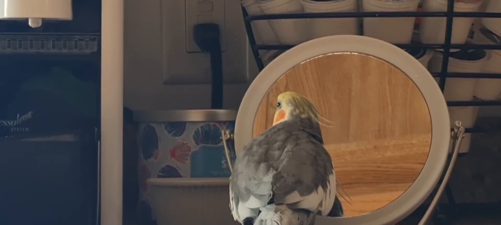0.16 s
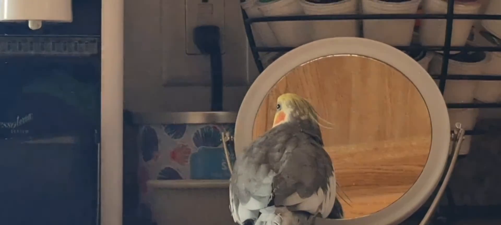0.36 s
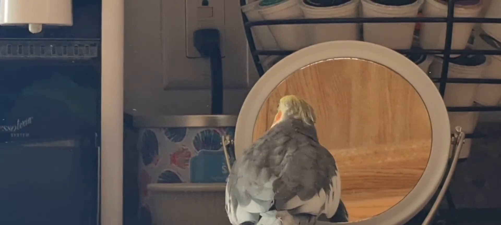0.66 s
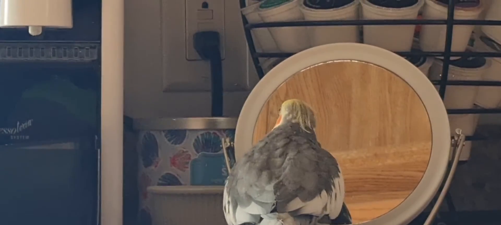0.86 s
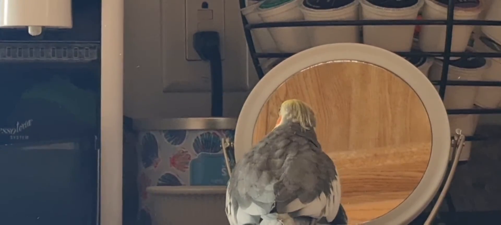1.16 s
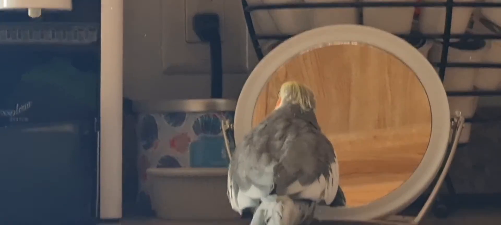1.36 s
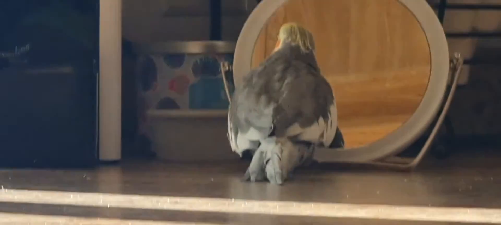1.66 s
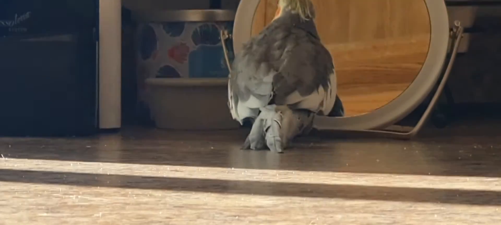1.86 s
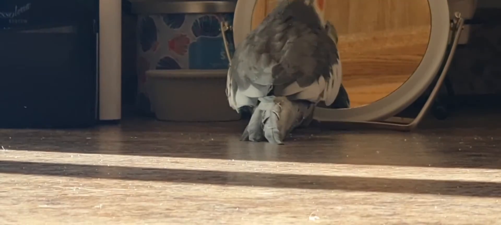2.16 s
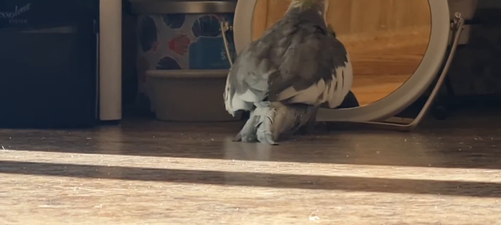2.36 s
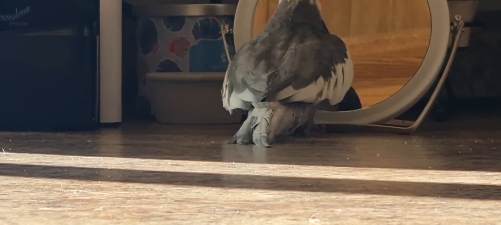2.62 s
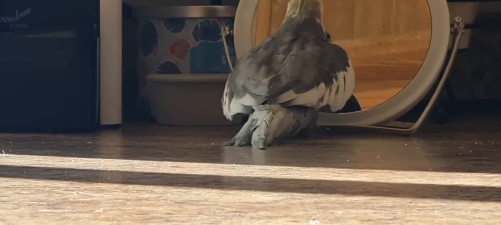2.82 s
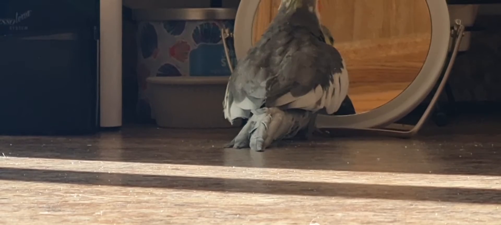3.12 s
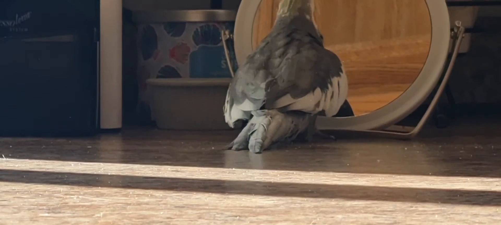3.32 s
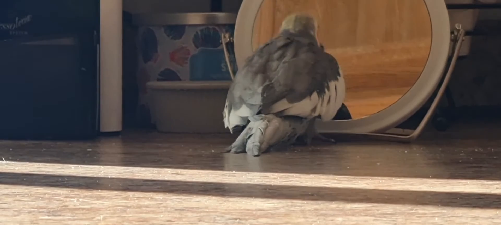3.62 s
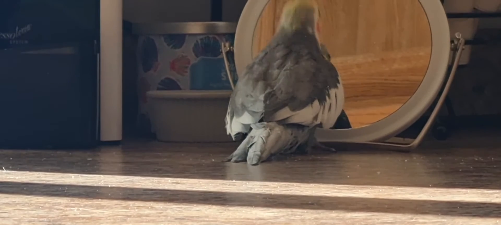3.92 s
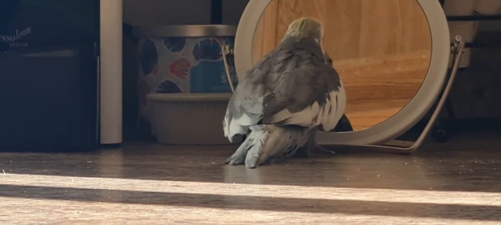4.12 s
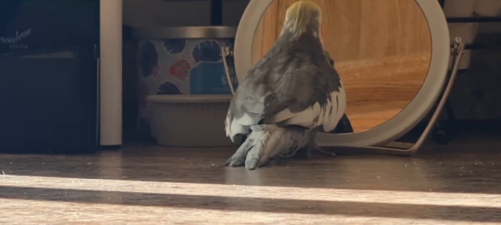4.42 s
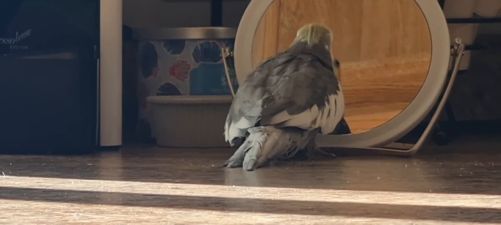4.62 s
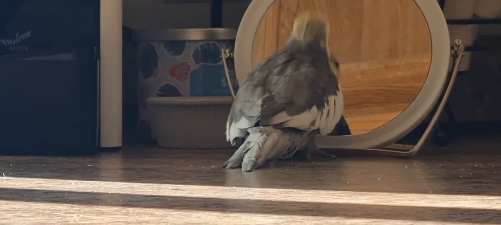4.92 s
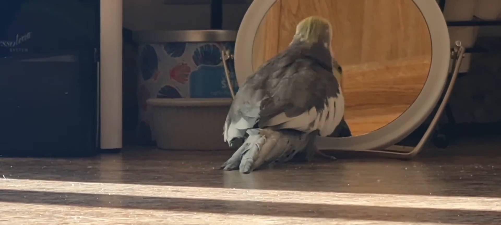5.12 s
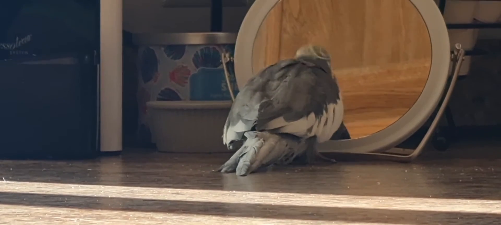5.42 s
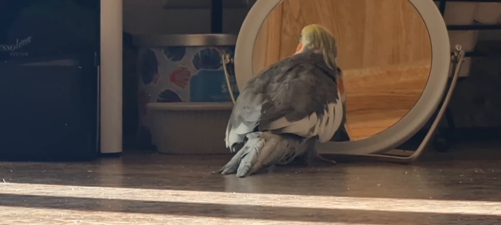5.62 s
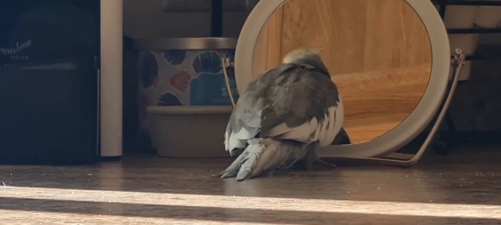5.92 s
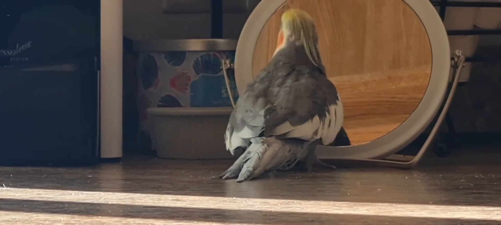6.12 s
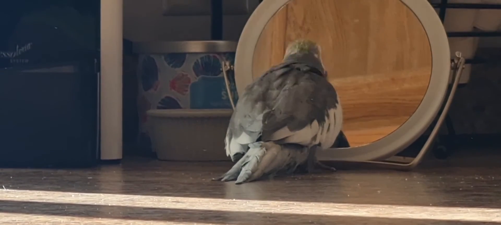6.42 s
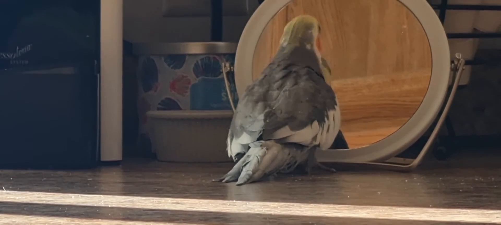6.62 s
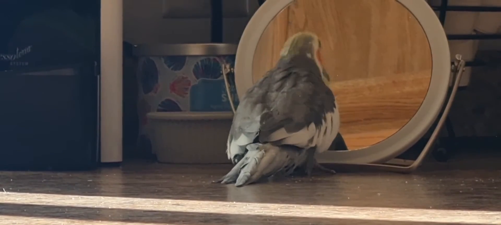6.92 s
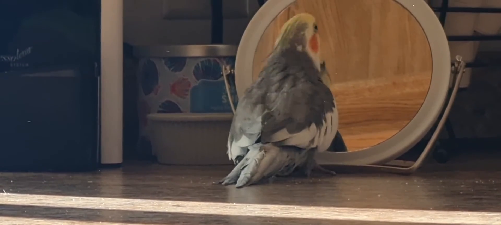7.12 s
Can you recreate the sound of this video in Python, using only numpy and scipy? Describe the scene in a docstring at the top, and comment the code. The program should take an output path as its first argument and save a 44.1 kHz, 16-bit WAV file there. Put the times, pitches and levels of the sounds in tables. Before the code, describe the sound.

In a quiet kitchen, a refrigerator hums faintly throughout. After a few soft, dull ticks, a cockatiel gives two hoarse chirps. It then starts rapping its beak on a table mirror, about twice a second, each knock with a glassy tick and a slight rattle. Short arched whistles, some wavering or raspy, fall between the raps. The bird sounds close and central, with a brief room reverberation.

```python
"""A refrigerator hums throughout in a quiet kitchen. After a few soft ticks, a cockatiel gives two hoarse
chirps, pulse trains filtered by its throat. From 2.4 s its beak raps a table mirror, exciting the modes
of frame and glass. From 2.9 s it whistles short arched notes among the raps: a near sine with faint
overtones, which turns raspy when its cycles group in twos to sevens. Faint scuffs pass at about 4 s.
Each call and rap leaves a brief reverberation in the room."""
import sys
import numpy as np
from scipy import signal
from scipy.io import wavfile
from scipy.ndimage import uniform_filter1d

SR = 44100
rng = np.random.default_rng(int(sys.argv[2]) if len(sys.argv) > 2 else 0)


def transcribe(signal):
    """Save signal, clipped to [-1, 1], as a 16-bit WAV file at the path in sys.argv[1]."""
    frames = np.atleast_2d(signal).T
    limited = np.clip(frames, -1, 1)
    pcm = np.round(limited * 32767).astype(np.int16)
    wavfile.write(sys.argv[1], SR, pcm)


N = 320607
CUTOFF_HZ = 15800

# Held and gliding notes, one table each. Each row: time in seconds, pitch in Hz, whistle level in dB,
# high overtones in dB re the whistle before the beak colours them.
GLIDING_NOTES = [
    [(2.915, 1717, -28.5, -27.5), (2.975, 1939, -9.5, -38.5), (3.011, 1930, -11.5, -40),
     (3.057, 2083, -14, -28.5), (3.163, 2012, -17, -28), (3.203, 2059, -19, -29), (3.227, 1919, -13, -30.5),
     (3.247, 1707, -28, -37), (3.26, 1830, -32, -39)],
    [(3.51, 1537, -38.5, -38), (3.528, 1528, -25, -28), (3.602, 2079, -14.5, -33.5),
     (3.656, 2111, -13.5, -43), (3.68, 1985, -13, -35), (3.726, 1330, -26, -32.5),
     (3.775, 1179, -34.5, -26.5)],
    [(4.852, 2096, -24, -47.5), (4.866, 2206, -24.5, -51.5), (4.882, 2230, -18.5, -50.5),
     (4.904, 2077, -15.5, -44.5), (4.932, 2200, -20.5, -36), (4.96, 2127, -23.5, -36),
     (4.99, 2196, -15.5, -34), (5.014, 1993, -16.5, -35), (5.03, 1900, -40.5, -43)],
    [(5.31, 1692, -32.5, -46), (5.322, 1676, -28.5, -46), (5.398, 1411, -25, -38), (5.41, 1354, -48, -47.5)],
    [(5.55, 1688, -30.5, -39.5), (5.592, 1877, -14, -41), (5.648, 1895, -15, -28.5), (5.73, 1783, -17, -35),
     (5.738, 1732, -22.5, -47.5), (5.786, 1733, -28, -35.5), (5.808, 1668, -27, -39.5),
     (5.912, 1641, -24, -29.5), (5.945, 1564, -31, -42)],
    [(6.515, 1830, -37.5, -15), (6.559, 1958, -10, -46), (6.569, 2050, -13, -43.5), (6.655, 2177, -21, -35),
     (6.687, 2076, -18, -33), (6.729, 2093, -23.5, -31.5), (6.821, 2134, -14, -24.5),
     (6.891, 1944, -14, -32.5), (6.905, 1949, -34, -37.5)],
    [(7.168, 1573, -32.5, -31), (7.188, 1620, -30.5, -39), (7.204, 1760, -16, -39),
     (7.242, 2020, -13, -41.5), (7.27, 2119, -18, -39)],
]
# Arched notes. Each row: start and end in seconds, first and top pitch in Hz, the two levels as above.
ARCHED_NOTES = [(3.298, 3.399, 1927, 2100, -16.5, -38), (4.638, 4.76, 1591, 2083, -15, -47.5),
                (5.106, 5.208, 1900, 2008, -13.5, -42), (5.994, 6.095, 1713, 1942, -14.5, -40.5),
                (6.963, 7.052, 2028, 2062, -14, -45.5)]


def song():
    """Self-sustained oscillation: whistle, overtones and rasp all follow one wavering pitch."""
    notes = [*GLIDING_NOTES, *[arch(*row) for row in ARCHED_NOTES]]
    (pitch, whistle_db, high_db), sounding = phrase(sorted(notes, key=lambda rows: rows[0][0]))
    rasp_db, cycles, breathiness = roughness(whistle_db)
    low_db = low_overtone_level(pitch, rasp_db)
    pitch = pitch + 13 * wobble(8.7, 110)   # 13 Hz rms of waver
    phase = 2 * np.pi * np.cumsum(pitch) / SR
    whistle = np.sqrt(2) * np.sin(phase)
    tones = whistle * from_db(1.22 * wobble(9.3, 68))
    tones += overtones(phase, pitch, low_db, high_db)
    beat = cycle_grouping(pitch, cycles, breathiness)
    rasp = from_db(whistle_db + rasp_db) * 2 * beat * whistle * sounding
    rasp = steep_band(rasp, 750, 2600)
    overtone_rasp = from_db(rasp_db + 6.5) * beat * band(tones, 2500, 11000)
    return panned(from_db(whistle_db) * (tones + overtone_rasp) * sounding + rasp, .1)


# Rise of an arched note. Each row: share of the length, share of the climb, level in dB re full.
ARCH_SHAPE = [(0, 0.011, -17), (.33, 0.802, -2.5), (0.596, .99, 0)]


def arch(start, end, first_hz, top_hz, db, high_db):
    """Pitch and level follow the breath: a note climbs and swells, then droops as it runs out."""
    droop_s, droop_hz, droop_db = .03, 240.8, -7
    rise = [(start + share * (end - start), first_hz + climb * (top_hz - first_hz), db + re_db, high_db)
            for share, climb, re_db in ARCH_SHAPE]
    return rise + [(end - droop_s, top_hz, db, high_db), (end, top_hz - droop_hz, db + droop_db, high_db)]


# Low overtone strength. Each row: time in seconds, level in dB re a clear whistle at 2 kHz.
LOW_OVERTONE_CURVE = [(2.95, -33), (3.05, -37.5), (3.2, -30), (3.35, -30), (3.6, -27), (4.7, -29.5),
                      (4.95, -32.5), (5.15, -31.5), (5.36, -27.5), (5.65, -30.5), (5.9, -25), (6.05, -27.5),
                      (6.56, -25.5), (6.7, -36), (6.85, -30), (7.0, -31), (7.22, -24.5)]


def low_overtone_level(pitch, rasp_db):
    """Spectral balance: the low overtones strengthen as pitch sinks and weaken in a strong rasp."""
    db_per_octave, rasp_knee_db = -9.5, -24
    db = np.interp(np.arange(N) / SR, *np.transpose(LOW_OVERTONE_CURVE))
    return db + db_per_octave * np.log2(pitch / 2000) - .9 * np.maximum(rasp_db - rasp_knee_db, 0)


# Low overtones. Each row: harmonic number, level offset in dB.
LOW_HARMONICS = [(2, -2.5), (3, -7)]
# High overtones. Each entry: harmonic number.
HIGH_HARMONICS = [4, 5, 6, 7, 8, 9]
# The beak's colouring of the high overtones. Each row: frequency in Hz, gain in dB.
BEAK_RESPONSE = [(6000, -11.5), (8300, -16.5), (10500, -13), (12600, -5.5), (14500, -12.5), (15800, -24)]


def overtones(phase, pitch, low_db, high_db):
    """Radiation of a harmonic series: the beak opens wider on high pitches and lets the top out."""
    gape_db_per_octave, blur_radians = 45.5, .3
    high_db = high_db + gape_db_per_octave * np.log2(pitch / 2000)
    levels = [(k, low_db + db) for k, db in LOW_HARMONICS]
    levels += [(k, high_db + at_hz(BEAK_RESPONSE, k * pitch)) for k in HIGH_HARMONICS]
    out = np.zeros(N)
    for k, db in levels:
        gain = from_db(db + 4.28 * wobble(4, 80))   # each comes and goes as the beak trembles
        blur = blur_radians * wobble(15, 120)
        out += gain * np.sqrt(2) * np.sin(k * phase + blur) * (k * pitch < CUTOFF_HZ)
    return out


# Raspy spells. Each row: start and end in seconds, cycles per group, rasp in dB re the whistle.
RASP_SPELLS = [(3.142, 3.215, 3, -47.5), (3.3, 3.322, 3, -15), (3.708, 3.742, 2, -24),
               (4.862, 4.896, 2, -29.5), (4.921, 4.978, 3, -26), (5.008, 5.032, 3, -26.5),
               (5.31, 5.345, 3, -10), (5.349, 5.402, 2, -26), (5.755, 5.802, 5, -10.5),
               (5.808, 5.856, 7, -16.5), (6.611, 6.768, 3, -25.5)]


def roughness(whistle_db):
    """Modulation depth: each spell sets its own rasp; between spells a weaker voice is rougher."""
    clear_rasp_db, loud_db = -52, -12.5
    rasp_db = clear_rasp_db + 1.48 * (loud_db - whistle_db)
    cycles, breathiness = np.full(N, 3.), np.full(N, .6)
    for start, end, group, db in RASP_SPELLS:
        spell = slice(round(start * SR), round(end * SR))
        rasp_db[spell], cycles[spell], breathiness[spell] = db, round(group), .36
    return uniform_filter1d(rasp_db, size=400), cycles, breathiness


def cycle_grouping(pitch, cycles, breathiness):
    """Subharmonics: grouped cycles put lines at fractions of the pitch, and turbulence smears them."""
    group_hz = pitch / cycles + 15 * wobble(25, 180)
    phase = 2 * np.pi * np.cumsum(group_hz) / SR
    lines = sum(np.cos(k * phase + k * k) * (2 * k <= cycles) for k in range(1, 4))
    return (1 - breathiness) * lines + breathiness * wobble(100, 670)


# Hoarse chirps, one table each. Each row: time in seconds, pulses per second, buzz level in dB,
# second harmonic level in dB.
HOARSE_CHIRPS = [
    [(.744, 1380, -39.5, -57.5), (.757, 1100, -48.5, -37.5), (.762, 930, -27.5, -19),
     (.771, 844, -31.5, -37), (.783, 950, -29.5, -22.5), (.802, 874, -36, -28.5), (.817, 525, -47, -42.5),
     (.83, 505, -58, -50)],
    [(.849, 560, -55.5, -38.5), (.858, 648, -43, -24), (.882, 723, -42, -24), (.897, 800, -24.5, -36.5),
     (.915, 938, -19, -12.5), (.936, 930, -27, -28.5), (.95, 850, -32.5, -41.5), (.98, 520, -52, -35.5),
     (.995, 570, -64.5, -66)],
]
# Throat resonances. Each row: centre in Hz, width in Hz, relative gain in dB.
FORMANTS = [(1470, 507, 6), (1946, 480, 8.5), (2620, 690, 3), (3970, 520, -20.5), (4720, 1000, -18),
            (7640, 1100, -28), (12900, 2400, -34.5)]


def chirps():
    """Source and filter: the throat colours pulses and breath; the windpipe favours harmonic two."""
    (rate, buzz_db, second_db), sounding = phrase(HOARSE_CHIRPS)
    phase = 2 * np.pi * np.cumsum(rate) / SR
    slack = np.gradient(rate) * SR < -4000   # the voice turns breathy in falls steeper than 4000 Hz/s
    breathiness = uniform_filter1d(np.where(slack, .77, .12), size=600)
    pulses = rms_one(sum(np.cos(k * phase) for k in range(1, 15)))
    source = (1 - breathiness) * pulses + 2.4 * breathiness * rng.standard_normal(N)
    buzz = np.zeros(N)
    for k, (hz, width_hz, db) in enumerate(FORMANTS):
        broad = band(source, hz - width_hz, hz + width_hz)
        buzz += (-1) ** k * from_db(db) * band(broad, hz - width_hz / 2, hz + width_hz / 2)
    second = from_db(second_db) * np.sqrt(2) * np.cos(2 * phase)
    return (rms_one(buzz) * from_db(buzz_db) + second) * sounding


# Beak blows. Each row: time in seconds, strength in dB, then brightness, deep thud and hollow thud
# in dB re that strength.
BLOWS = [(2.389, -8.5, -24, -34.5, -27), (2.862, -6, -23, -26.5, -30), (3.325, -10, -29.5, -34, -27.5),
         (3.714, -13.5, -26.5, -37, -29), (4.089, -8, -30.5, -27.5, -31), (4.613, -8.5, -35, -29, -22.5),
         (5.082, -11.5, -30.5, -36.5, -24.5), (5.51, -10.5, -38, -47, -22), (6.015, -12.5, -31, -34.5, -26),
         (6.485, -8, -30, -35.5, -29), (6.928, -9, -42, -39, -31)]
# Two frame thuds, then the body's modes. Each row: frequency in Hz, relative level in dB, T60 in seconds.
MIRROR_MODES = [(252, 4.5, 0.079), (393.6, 4, 0.073), (970.3, -11, 0.087), (1152, -12.5, 0.074),
                (1394, 0, 0.018), (1480, -1, 0.0077), (1800, -4, 0.033), (2446, -7.5, 0.021)]
# Modes of the glass. Each row: frequency in Hz, relative level in dB, T60 in seconds.
GLASS_MODES = [(3300, -9.5, 0.013), (3540, 3.5, 0.032), (4910, -1, 0.033), (6000, -20.5, 0.0088),
               (8800, -2.5, .03)]


def raps():
    """Impact excitation: the beak sets off frame thuds, a body knock, a glass tick and a rattle."""
    contact_s = .0015
    times, blow_db, bright_db, deep_db, hollow_db = np.transpose(BLOWS)
    hits = np.round((times + contact_s) * SR).astype(int)
    parts = [(MIRROR_MODES[:1], deep_db, (190, 320)), (MIRROR_MODES[1:2], hollow_db, (310, 480)),
             (MIRROR_MODES[2:], -8, (750, 9000)), (GLASS_MODES, bright_db, (2500, 15000))]
    out = np.zeros(N)
    for modes, db, edges_hz in parts:
        clicks = np.zeros(N)
        clicks[hits] = -from_db(blow_db + db)
        out += band(ring(clicks, modes), *edges_hz)   # each part radiates only near its own modes
    return out + rattle(hits, blow_db, bright_db)


def ring(clicks, modes):
    """Modal vibration: each click drives every damped resonator with a random strength of its own."""
    out, hits = np.zeros(N), np.flatnonzero(clicks)
    for hz, db, t60 in modes:
        decay, angle = from_db(-60 / (t60 * SR)), 2 * np.pi * hz / SR
        force = clicks + 1e-18
        force[hits] *= from_db(db + rng.normal(0, 2.2, len(hits)))
        out += signal.lfilter([0, np.sin(angle)], [1, -2 * decay * np.cos(angle), decay * decay], force)
    return out


# Bands of the stand's rattle. Each row: lower and upper edge in Hz.
RATTLE_BANDS = [(900, 3500), (3500, 7600), (8400, 10500), (10500, 15600)]
# Decay of those bands. Each row: level in dB re the blow, T60 in seconds.
RATTLE_DECAYS = [(-21, 0.1), (-32.5, 0.17), (-39, 0.16), (-40.5, 0.21)]


def rattle(hits, blow_db, bright_db):
    """Exponential decay of noise: the stand rattles briefly, with more treble after a bright blow."""
    out = np.zeros(N)
    for (low_hz, high_hz), (db, t60) in zip(RATTLE_BANDS, RATTLE_DECAYS):
        clicks = np.zeros(N)
        clicks[hits] = from_db(blow_db + .4 * (bright_db + 27) * (low_hz > 3000))
        envelope = signal.lfilter([1], [1, -from_db(-60 / (t60 * SR))], clicks + 1e-18)
        out += from_db(db) * envelope * wobble(low_hz, high_hz)
    return out


# Faint hisses. Each row: start and end in seconds, lower and upper edge in Hz, top level in dB.
HISSES = [(4.0, 4.097, 1844, 7490, -47.5), (4.034, 4.146, 3160, 3370, -42),
          (4.044, 4.142, 6110, 6450, -50.5), (4.404, 4.49, 2510, 7360, -71)]


def scuffs():
    """Band-limited noise swells and stops; a narrow band is heard as a thin squeak."""
    t, out = np.arange(N) / SR, np.zeros(N)
    for start, end, low_hz, high_hz, db in HISSES:
        swell = np.interp(t, [start, end, end + .0067], [0, 1, 0]) ** 2
        out += from_db(db) * swell * wobble(low_hz, high_hz)
    return out


# Ticks nearby. Each row: time in seconds, impulse level in dB before filtering, left minus right in dB.
SOFT_TICKS = [(0.393, -13.5, -17), (0.418, -32, -12), (.445, -19.5, -15), (0.495, -17.5, -18),
              (0.516, -22, -9)]


def ticks():
    """Band-limited impulses are heard as faint dull ticks off to the right."""
    out = np.zeros((2, N))
    for time, db, pan_db in SOFT_TICKS:
        out[:, round(time * SR)] = panned(from_db(db), pan_db)
    return band(out + 1e-18, 140, 580)


# Rumble and air. Each row: frequency in Hz, relative spectral density in dB.
HUM_SPECTRUM = [(30, -8), (52, 8.5), (120, -8), (260, -13.5), (600, -13.5), (900, -28), (1300, -32),
                (2200, -42.5), (3500, -45), (4600, -41), (5400, -35), (6500, -46), (8500, -61),
                (13000, -50), (16000, -54)]
# Likeness of the two channels. Each row: frequency in Hz, correlation coefficient.
HUM_CORRELATION = [(40, .96), (150, .92), (500, .2), (1500, .1), (10000, .05)]
# Motor tones. Each row: frequency in Hz, rms level in dB.
MOTOR_LINES = [(120, -63.5), (480, -75), (600, -75.5), (1130, -86.5)]


def refrigerator():
    """A line spectrum over a continuous one: motor tones above half-octave bands of rumble and air."""
    noise, noise_db = 0, -55
    edges_hz = 20 * 2 ** np.arange(0, 10, .5)
    white = rng.standard_normal((2, 2, N))
    for k, (low, high) in enumerate(zip(edges_hz, edges_hz[1:])):
        mid, side = band(band(white[k % 2], low, high), low / 2, min(2 * high, .45 * SR))
        centre_hz = np.sqrt(low * high)
        alike = at_hz(HUM_CORRELATION, centre_hz)
        stereo = np.sqrt(1 + alike) * mid + np.sqrt(1 - alike) * side * [[1], [-1]]
        noise = noise + from_db(at_hz(HUM_SPECTRUM, centre_hz)) * stereo
    t = np.arange(N) / SR
    motor = sum(from_db(db) * np.sqrt(2) * np.sin(2 * np.pi * hz * t) for hz, db in MOTOR_LINES)
    return from_db(noise_db) * rms_one(noise) + motor


# Decay of the kitchen. Each row: frequency in Hz, T60 in seconds.
REVERBERATION_TIMES = [(200, 0.34), (700, 0.32), (2000, 0.37), (5000, 0.38), (12000, 0.28)]


def kitchen(x):
    """Diffuse reverberation: dense echoes from 4 ms on, each octave dying at its own rate."""
    t, tail = np.arange(SR) / SR, 0
    white = rng.standard_normal((2, SR)) * np.clip((t - .004) / .0014, 0, 1)
    for low in 125 * 2. ** np.arange(7):
        t60 = at_hz(REVERBERATION_TIMES, low * np.sqrt(2))
        tail = tail + band(white, low, 2 * low) * from_db(-60 * t / t60)
    mid, side = tail / np.sqrt(np.sum(tail ** 2, axis=1, keepdims=True))
    return signal.fftconvolve(x[None], np.array([mid + side, mid - side]), axes=1)[:, :N]


def phrase(notes):
    """Interpolation joins notes into smooth curves, with a gate that is 1 while one sounds."""
    t, rows = np.arange(N) / SR, np.concatenate(notes)
    curves = [uniform_filter1d(np.interp(t, rows[:, 0], column), size=300) for column in rows.T[1:]]
    gate = sum((t >= note[0][0]) & (t < note[-1][0]) for note in notes)
    return curves, uniform_filter1d(np.minimum(gate, 1.), size=260)


def wobble(low_hz, high_hz):
    """Band-limited Gaussian noise of unit rms."""
    return rms_one(steep_band(rng.standard_normal(N), low_hz, high_hz))


def band(x, low_hz, high_hz):
    """Band-pass filtering."""
    return signal.sosfilt(signal.butter(2, [low_hz, high_hz], "band", fs=SR, output="sos"), x)


def steep_band(x, low_hz, high_hz):
    """Two band-passes in cascade give steeper skirts."""
    return band(band(x, low_hz, high_hz), low_hz, high_hz)


def from_db(db):
    """Decibels to amplitude ratio."""
    return 10 ** (np.asarray(db) / 20)


def rms_one(x):
    """Normalisation to unit rms."""
    return x / np.sqrt(np.mean(x ** 2) + 1e-20)


def at_hz(points, hz):
    """Interpolation on a log-frequency axis."""
    frequencies, values = np.transpose(points)
    return np.interp(np.log(hz), np.log(frequencies), values)


def panned(x, db):
    """Level difference: left louder than right by db."""
    return np.array([x * from_db(db / 2), x * from_db(-db / 2)])


def scene():
    """Superposition: bird and mirror with their reverberation, over the ticks and the hum."""
    voice_room_db, knock_room_db = -7, -8.5
    voice = song() + panned(chirps(), -1.3)
    knocks = raps() + scuffs()
    echoes = kitchen(from_db(voice_room_db) * voice.mean(axis=0) + from_db(knock_room_db) * knocks)
    return voice + panned(knocks, 1.1) + echoes + ticks() + refrigerator()


def record(dry):
    """Stereo pickup: the right port hears more treble, a sample later; deep bass and the top are cut."""
    treble_hz, treble_right_db = 4955, 3.5
    dry = signal.sosfilt(signal.butter(4, 44, "high", fs=SR, output="sos"), dry)
    treble = signal.sosfilt(signal.butter(1, treble_hz, "high", fs=SR, output="sos"), dry)
    left, right = dry + treble * (from_db([[-treble_right_db / 2], [treble_right_db / 2]]) - 1)
    both = np.array([left, np.append(0, right[:-1])])
    return signal.sosfilt(signal.cheby2(16, 60, CUTOFF_HZ + 150, fs=SR, output="sos"), both)


dry = scene()
out = record(dry)
transcribe(out)
```